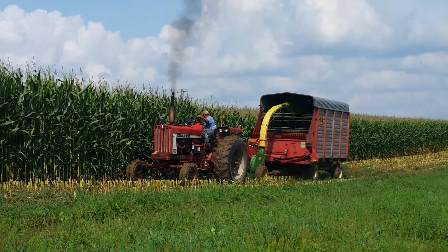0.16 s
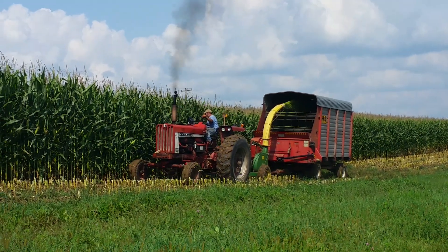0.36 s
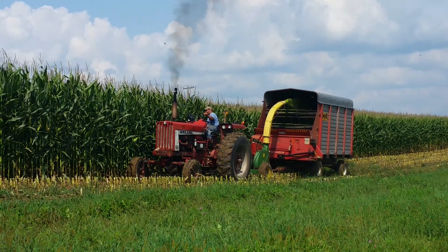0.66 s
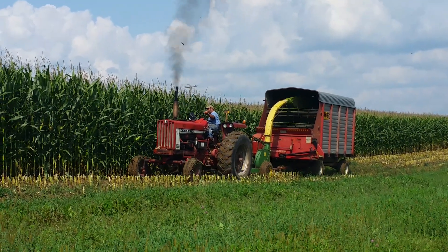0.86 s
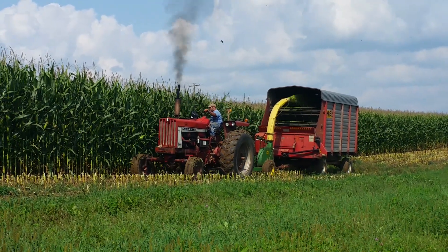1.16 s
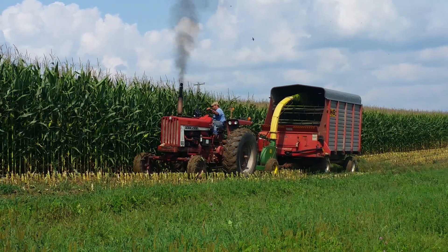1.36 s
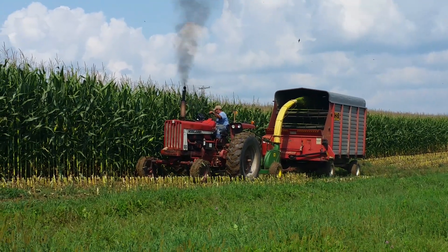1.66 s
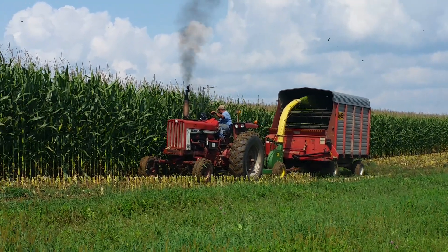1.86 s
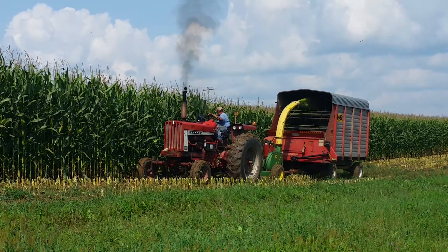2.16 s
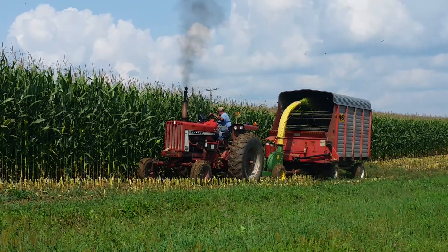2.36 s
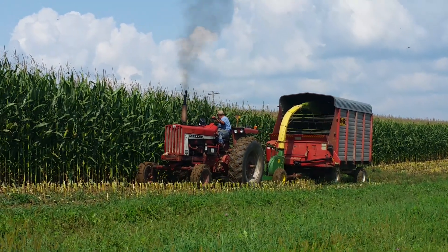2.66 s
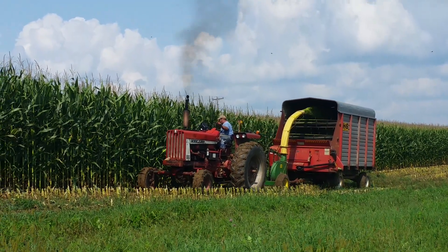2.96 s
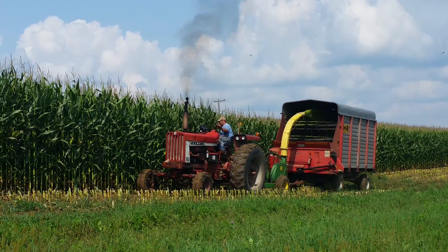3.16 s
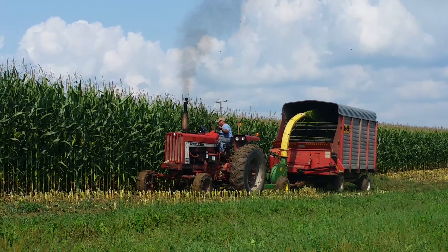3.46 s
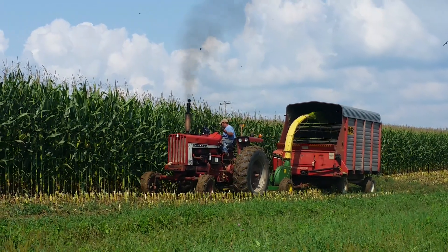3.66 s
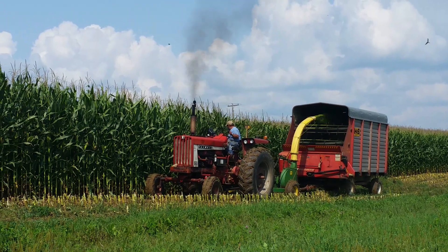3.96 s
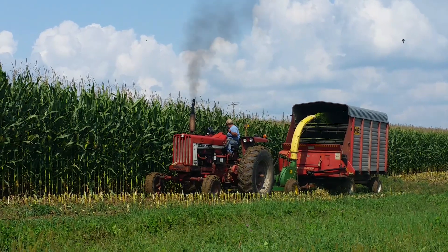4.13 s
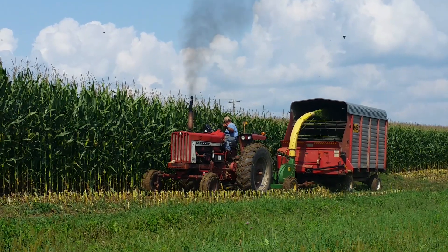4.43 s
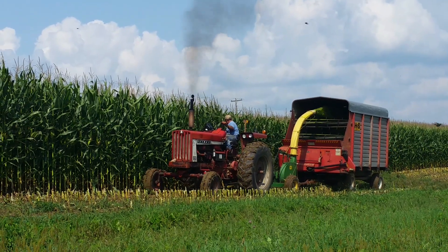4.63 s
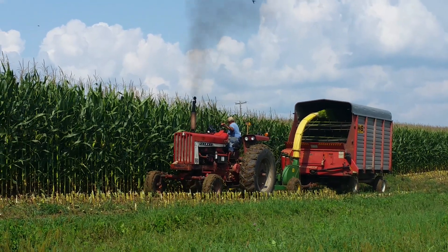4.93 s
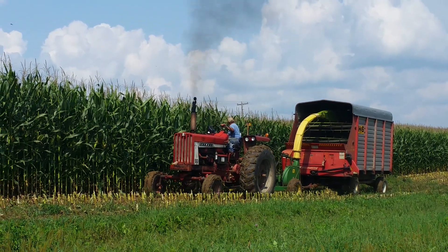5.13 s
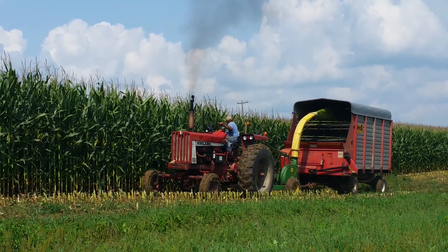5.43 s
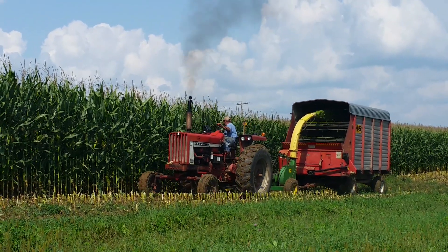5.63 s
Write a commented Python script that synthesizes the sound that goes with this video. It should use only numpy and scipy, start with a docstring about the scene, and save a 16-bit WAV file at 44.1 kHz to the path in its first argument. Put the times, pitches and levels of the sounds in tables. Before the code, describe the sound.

A diesel tractor booms steadily under load across a field while a forage harvester drones and chopped corn rushes and crackles up a spout.

```python
"""A six-cylinder diesel tractor pulls a forage harvester along a corn field, some way off.
The engine booms from an open stack, its block clattering in step, and sags about a second in.
It recovers, speeds up until three seconds, eases near four, then surges to its fastest at five.
Throughout, the cutterhead drones at a fixed ratio to the engine, its notes coming and going;
chopped stalks crackle and rush up the spout, loudest near five seconds. The right port is dull in the treble."""
import sys
import numpy as np
from scipy import signal
from scipy.fft import rfft, irfft
from scipy.io import wavfile

SR = 44100
rng = np.random.default_rng(int(sys.argv[2]) if len(sys.argv) > 2 else 0)


def persist_wave(psi):
    """Save psi, clipped to +-1, as 16-bit WAV."""
    counts = np.round(np.clip(psi, -1, 1) * 32767).astype(np.int16)
    wavfile.write(sys.argv[1], SR, np.atleast_2d(counts).T)


N = 255339
TIME, FREQS = np.arange(N) / SR, np.fft.rfftfreq(N, 1 / SR)  # s, Hz
FIRINGS_PER_CYCLE = 6  # six cylinders fire once each in a four-stroke cycle


def gain_of(db):
    """Decibels to amplitude."""
    return 10 ** (np.asarray(db) / 20)


def evened(x):
    """Scales to rms 1."""
    return x / np.sqrt(np.mean(x ** 2) + 1e-20)


def curve(rows, axis=1):
    """One column of a timed table at every sample."""
    rows = np.array(rows)
    return np.interp(TIME, rows[:, 0], rows[:, axis])


def read(points):
    """A spectrum table at every frequency, straight lines over log frequency."""
    hz, value = np.transpose(points)
    return np.interp(np.log(FREQS + 1), np.log(hz + 1), value)


def colour(x, gain):
    """Filters by a gain at every frequency."""
    return irfft(rfft(x) * gain, N)


def wander(rate):
    """Slow random drift of rms 1, up to about rate turns a second."""
    return evened(colour(rng.standard_normal(N), 1 / (1 + (FREQS / rate) ** 4)))


def ring(x, modes):
    """Causal resonances with steep skirts, summed."""
    response = 0
    for hz, width, db in modes:
        response = response + gain_of(db) / (1 + 1.3j * (FREQS - hz) / width) ** 2
    return colour(x, response)


# Likeness of the two ports.
# Each row: frequency in Hz, likeness from 0 (unrelated) to 1 (identical).
PORT_LIKENESS = [(25, 0.9), (70, 0.86), (300, 0.9), (750, 0.88), (1200, 0.56), (2000, 0.2), (3500, 0.6),
                 (5500, 0), (15000, 0.17)]


def ports(pair):
    """Two unrelated signals become a pair of rms 1 that agrees in the bass and mostly parts in the treble."""
    same = np.clip(read(PORT_LIKENESS), 0, 1)
    left = pair[0]
    right = colour(left, same) + colour(pair[1], np.sqrt(1 - same ** 2))
    return evened(np.array([left, right]))


def strokes(firings, table, decay, uneven_db):
    """Envelope of blows that return each cycle, peak decay firings after their place and die, unevenly hard."""
    out = np.zeros(N)
    for place, db in table:
        cycle, since = np.divmod(firings - place, FIRINGS_PER_CYCLE)
        force_db = db + uneven_db * rng.standard_normal(256)[cycle.astype(int)]
        out += gain_of(force_db) * since / decay * np.exp(-since / decay)
    return evened(out)


def rattle(firings, rough):
    """Fine grain of the machinery: part repeats with each cycle, the share rough is new each time."""
    size = 2730  # grains in a cycle
    grain = (firings / FIRINGS_PER_CYCLE % 1 * size).astype(int)
    random_phases = np.exp(2j * np.pi * rng.random((2, size // 2 + 1)))
    again = evened(irfft(random_phases)[:, grain])
    rough = np.clip(rough, 0, 1)
    return np.sqrt(1 - rough) * again + np.sqrt(rough) * rng.standard_normal((2, N))


def tone(turns, rough, rate):
    """A sine of rms about 1 whose height and phase waver."""
    angle = 2 * np.pi * turns
    in_phase = (1 + rough * wander(rate)) * np.sin(angle)
    sideways = rough * wander(rate) * np.cos(angle)
    return np.sqrt(2) * (in_phase + sideways)


def fading(depth_db):
    """A steady tone fades in and out at random on its way across the field; depth_db is rms."""
    return gain_of(depth_db * wander(5.8))


def breeze():
    """Faint wind rumble, low-passed noise unrelated in the two ports, in slow gusts."""
    rumble = colour(rng.standard_normal((2, N)), 1 / (1 + (FREQS / 45) ** 4))
    return gain_of(-44.5) * evened(rumble * gain_of(1.5 * wander(2)))


# Spectrum of the crop rushing through the spout.
# Each row: frequency in Hz, relative level in dB per Hz.
RUSH_SPECTRUM = [(300, -7.5), (740, 3), (870, -8), (1120, -1), (1950, 0.5), (2200, -4.5), (2750, -3.5),
                 (3500, -0.5), (5000, -1), (6400, 3), (7600, -4.5), (9500, -10), (11000, -6), (13200, -11),
                 (15600, -23.5)]


def crop():
    """Chopped stalks rush up the spout; hard bits crunch against its wall in short bursts."""
    rush = colour(rng.standard_normal((2, N)), gain_of(read(RUSH_SPECTRUM)))
    rush = rush * gain_of(0.65 * wander(23))
    bits_per_s, burst_s = 220, 0.0033
    hardness_db = 5.7 * np.minimum(rng.exponential(1, N), 3)
    bits = (rng.random(N) < bits_per_s / SR) * gain_of(hardness_db)
    envelope = signal.lfilter([1], [1, -np.exp(-1 / (burst_s * SR))], bits)
    bursts = envelope * rng.standard_normal((2, N))
    # wall modes: Hz, width in Hz, relative dB
    crunch = ring(bursts, [(2760, 1300, -4), (4090, 1600, -0.5), (5330, 1900, 1.0)])
    return gain_of(-27.5) * ports(rush) + gain_of(-35.5) * ports(crunch)


# Gear whine, before its random fading and once-a-turn swell.
# Each row: time in seconds, second mesh harmonic in dB, third mesh harmonic in dB.
WHINE_LEVELS = [(0, -42, -50), (1.7, -43, -56), (3, -45.5, -52), (4, -46.5, -42.5), (4.7, -45.5, -53),
                (5.79, -50, -54)]
GEAR_TEETH = 44


def gears(firings):
    """Meshing teeth sing on two harmonics of the mesh rate, both fluttering at random."""
    wheel_turns = firings / FIRINGS_PER_CYCLE
    mesh = GEAR_TEETH * wheel_turns
    runout = 1 + 0.6 * np.cos(2 * np.pi * wheel_turns)  # an off-centre wheel presses harder once a turn
    low = gain_of(curve(WHINE_LEVELS, axis=1)) * runout * tone(2 * mesh, rough=0.12, rate=27)
    high = gain_of(curve(WHINE_LEVELS, axis=2)) * tone(3 * mesh, rough=.5, rate=16)
    return fading(1.5) * (low + high)


# Valve ticks in one engine cycle.
# Each row: place in the cycle in firings, relative force in dB.
VALVE_TICKS = [(.55, 1), (1.62, 1), (2.52, 0), (3.7, -23), (4.48, 10.5)]
# Ring of the valves' steel.
# Each row: time in seconds, level in dB.
STEEL_LEVEL = [(0, -38), (.7, -44), (1.3, -33.5), (2.4, -41), (4, -38), (5.79, -38)]


def valves(firings, load):
    """Valves land with a dry click, louder under load, and their steel rings on."""
    blows = rng.standard_normal((2, N)) * strokes(firings, VALVE_TICKS, decay=0.082, uneven_db=1.0)
    steel = ring(blows, [(6215, 300, 0)])  # Hz, width in Hz, relative dB
    # the click is smeared by scattering off the hood and the corn
    smear = strokes(firings, VALVE_TICKS, decay=0.091, uneven_db=1.0) ** 0.82
    scatter = rng.standard_normal((2, N)) * smear
    click = ring(scatter, [(4350, 730, -1.0), (8220, 1800, 5.5), (10070, 550, 5.5), (12400, 720, 3)])
    return gain_of(curve(STEEL_LEVEL)) * ports(steel) + load * gain_of(-41.5) * ports(click)


# Diesel knock of each cylinder.
# Each row: place in the cycle in firings, relative force in dB.
DIESEL_KNOCKS = [(.72, 0), (1.7, -6), (2.7, -1), (3.68, -11), (4.65, -12), (5.7, -11.5)]
# Resonances of the block and hood.
# Each row: frequency in Hz, width in Hz, relative level in dB.
BLOCK_MODES = [(995, 40, -1.5), (1064, 112, -1), (1310, 79, 1), (1737, 143, -3.5), (2067, 37, -1),
               (2380, 59, 0), (2623, 63, 0), (2990, 140, -8), (3670, 220, -13), (4330, 87, -9)]


def block(firings):
    """Combustion clatter rings the block and hood much alike in every cycle."""
    knocks = strokes(firings, DIESEL_KNOCKS, decay=0.06, uneven_db=0.5)
    clatter = rattle(firings, rough=0.34) * (2.5 + knocks)
    return gain_of(-33.0) * ports(ring(clatter, BLOCK_MODES))


CUTTER_RATIO = 17 / 21  # knife cuts per engine firing
# Lowest note of the cutterhead, which throbs against the exhaust boom.
# Each row: time in seconds, level in dB.
THROB_LEVEL = [(0, -27), (1.6, -36), (2.6, -29), (2.95, -23), (3.6, -28), (4.8, -38), (5.6, -24)]
# Second harmonic of the cuts, before its random fading.
# Each row: time in seconds, level in dB.
SECOND_HARMONIC_LEVEL = [(0.0, -36), (0.2, -22.0), (0.46, -24.5), (0.58, -42), (0.7, -27), (0.78, -33.0),
                         (1.34, -34), (1.44, -23.5), (1.96, -24), (2.3, -37.0), (2.38, -27.0),
                         (3.02, -33.5), (3.24, -23), (3.54, -29.0), (3.62, -22), (4.04, -23), (4.26, -38.0),
                         (5.78, -26)]
# Fourth harmonic of the cuts, before its random fading.
# Each row: time in seconds, level in dB.
FOURTH_HARMONIC_LEVEL = [(0.0, -36), (0.46, -24.0), (0.78, -37), (0.84, -28.0), (2.4, -34.5), (2.54, -41),
                         (2.68, -22), (2.82, -31), (3.04, -23.5), (3.42, -27.5), (3.48, -41), (3.68, -28.5),
                         (4.22, -37.5), (4.5, -27.5), (4.66, -37.5), (5.32, -27.5), (5.4, -32.5),
                         (5.78, -36.0)]
# Spectrum of the air churned by the blower.
# Each row: frequency in Hz, relative level in dB per Hz.
CHURN_SPECTRUM = [(15, -28), (35, -25), (55, -7), (85, -2), (125, 2.5), (165, -4), (205, -8.5), (250, -5.5),
                  (290, 0.5), (345, -3), (390, -10.5), (430, -25.5), (520, -46), (900, -56)]


def cutterhead(firings):
    """Knives chop the air at a fixed ratio to the engine, the crop roughens their drone; the blower churns air."""
    cuts = CUTTER_RATIO * firings
    fade_db = 1.2
    drone = gain_of(curve(THROB_LEVEL)) * tone(cuts, rough=.05, rate=5)
    second = tone(2 * cuts, rough=0.11, rate=9.3)
    drone += gain_of(curve(SECOND_HARMONIC_LEVEL)) * fading(fade_db) * second
    fourth = tone(4 * cuts, rough=.1, rate=6)
    drone += gain_of(curve(FOURTH_HARMONIC_LEVEL)) * fading(fade_db) * fourth
    for order, db in [(3, -41.0), (5, -45)]:
        drone += gain_of(db) * tone(order * cuts, rough=0.54, rate=5.7)
    churn = colour(rattle(firings, rough=0.82), gain_of(read(CHURN_SPECTRUM)))
    return drone + gain_of(-27.5) * ports(churn)


# Exhaust note, before its swell.
# Each row: multiple of the four-stroke cycle rate, level in dB rms.
EXHAUST_NOTE = [(3, -46.5), (4, -40), (5, -76), (6, -12), (7, -38), (8, -40.5), (9, -43.5), (10, -62),
                (12, -41.5), (16, -44), (18, -63), (22, -64)]
# Swell of the exhaust boom.
# Each row: time in seconds, gain in dB.
BOOM_SWELL = [(0, 0.7), (1.6, 0.5), (2.3, 0), (3.1, -1), (3.9, 0.9), (4.6, 0.5), (5.79, -0.5)]
# Exhaust puffs in one engine cycle.
# Each row: place in the cycle in firings, relative force in dB.
EXHAUST_PUFFS = [(.52, -10.5), (1.419, -11), (2.251, -7), (2.56, -19), (3.5, -22), (4.299, -11.5),
                 (5.332, -6)]
# Resonances of the exhaust stack.
# Each row: frequency in Hz, width in Hz, relative level in dB.
STACK_MODES = [(449, 5.8, 1), (547.5, 8, -1), (610, 46.4, 5), (663, 32, -3), (787.5, 22.6, -1)]


def exhaust(firings, load):
    """The clean boom of the stack, with sharp puffs and hoarse noise that ring the pipe harder under load."""
    cycles = firings / FIRINGS_PER_CYCLE
    boom = np.zeros(N)
    for order, db in EXHAUST_NOTE:
        boom += gain_of(db) * tone(order * cycles, rough=0.028, rate=14)
    puffs = ring(strokes(firings, EXHAUST_PUFFS, decay=0.016, uneven_db=1.1), STACK_MODES)
    puffs = evened(colour(puffs, FREQS ** 4 / (FREQS ** 4 + 380 ** 4)))  # high-pass keeps them off the boom
    hoarse = ring(rattle(firings, rough=0.78), STACK_MODES)
    pipe = gain_of(-38) * puffs + gain_of(-39.5) * ports(hoarse)
    return gain_of(curve(BOOM_SWELL)) * boom + load * pipe


# Engine speed under load.
# Each row: time in seconds, speed in firings per second.
ENGINE_SPEED = [(0.0, 96.1), (0.58, 96.02), (1.1, 93.3), (1.96, 94.6), (2.25, 96.22), (2.74, 96.44),
                (3.0, 97.89), (3.79, 95.76), (4.22, 95.71), (4.77, 98.99), (5.0, 99.22), (5.51, 96.73),
                (5.79, 98.18)]
# Flow of chopped crop.
# Each row: time in seconds, relative flow in dB.
CROP_FLOW = [(0.0, -28), (0.35, -28.5), (1.1, -27.5), (2.82, -28.5), (5.01, -26), (5.79, -27)]


def scene():
    """Engine and cutter parts turn with one crank; the flow of crop sets the load and the rush."""
    # the crank runs a little ahead or behind as the load jerks it: rms 0.005 firings
    hunting = .005 * wander(3)
    firings = np.cumsum(curve(ENGINE_SPEED)) / SR + hunting
    load = evened(gain_of(curve(CROP_FLOW)))
    harvester = breeze() + load * crop() + cutterhead(firings)
    tractor = gears(firings) + valves(firings, load) + load * block(firings) + exhaust(firings, load)
    return harvester + tractor


# Balance of the two ports.
# Each row: frequency in Hz, left minus right in dB.
PORT_BALANCE = [(60, -1), (92, 4.0), (140, 4), (210, 1), (330, 5), (500, 7), (770, 4.5), (1170, 6),
                (1790, 9.0), (2740, 12.5), (4190, 17.0), (6410, 34.5), (9810, 14.5), (15000, 3)]


def record(dry):
    """The right port is mostly weaker, muffled and late below the treble; peaks are rounded, then band-limited."""
    lean = gain_of(read(PORT_BALANCE))
    lag_s = 2 / SR / (1 + (FREQS / 4500) ** 4)
    right = np.exp(-2j * np.pi * FREQS * lag_s)
    heard = colour(dry, 2 * np.array([lean, right]) / (1 + lean))
    heard = heard / (1 + (heard / .97) ** 16) ** (1 / 16)  # rounds only the highest peaks
    band_limit = signal.firwin(511, 15750, window=("kaiser", 9), fs=SR)  # low-pass, Hz
    return signal.oaconvolve(heard, band_limit[None], "same")


dry = scene()
out = record(dry)
persist_wave(out)
```